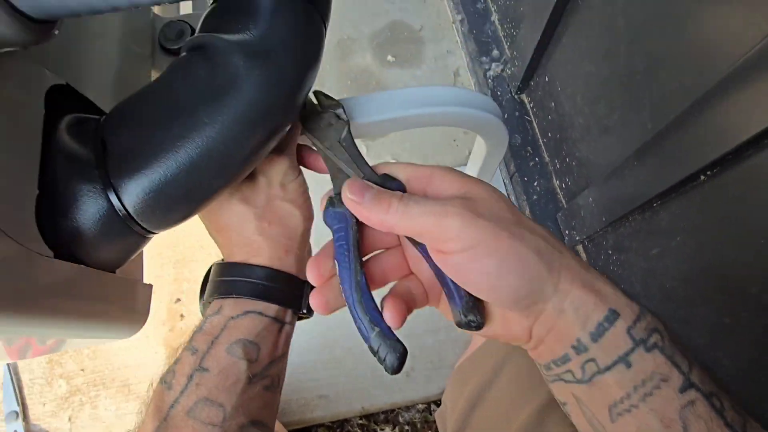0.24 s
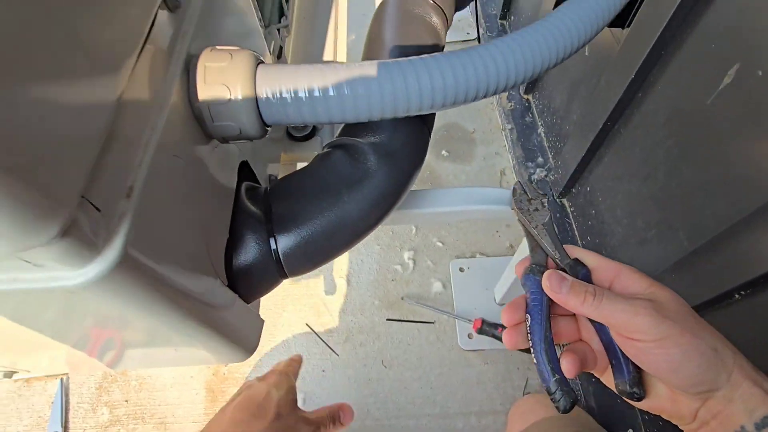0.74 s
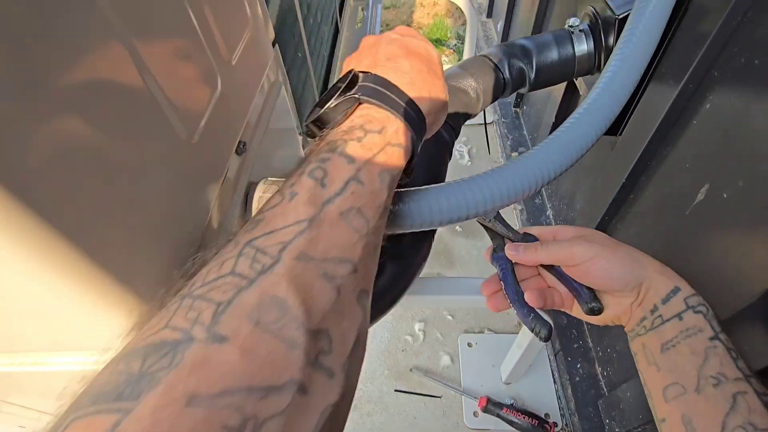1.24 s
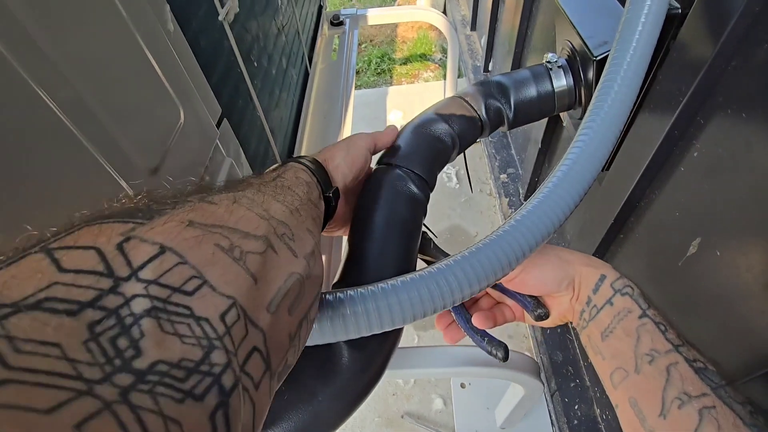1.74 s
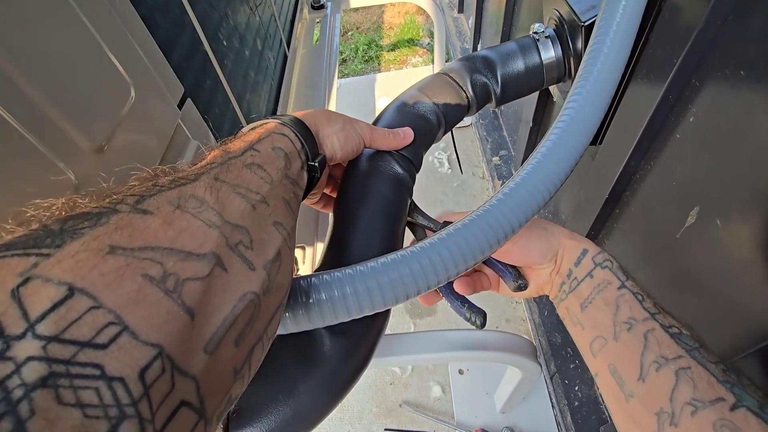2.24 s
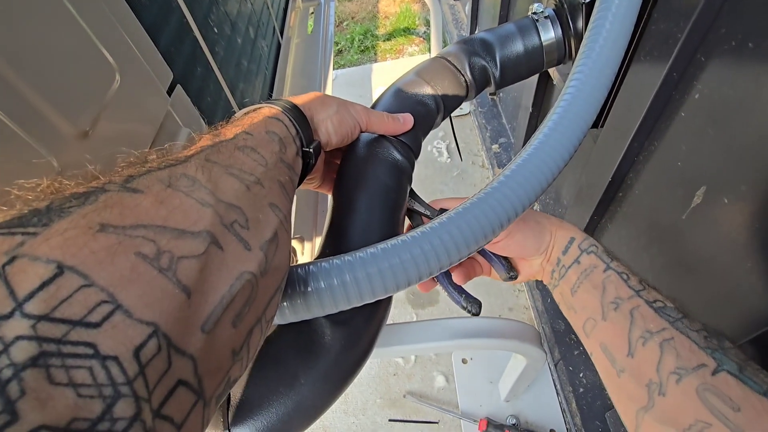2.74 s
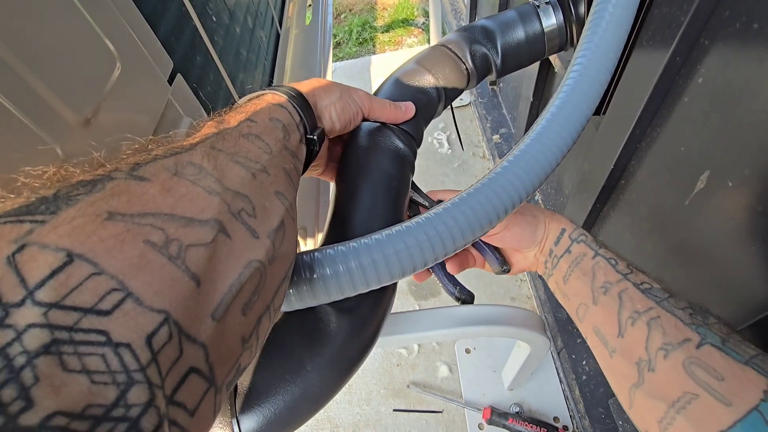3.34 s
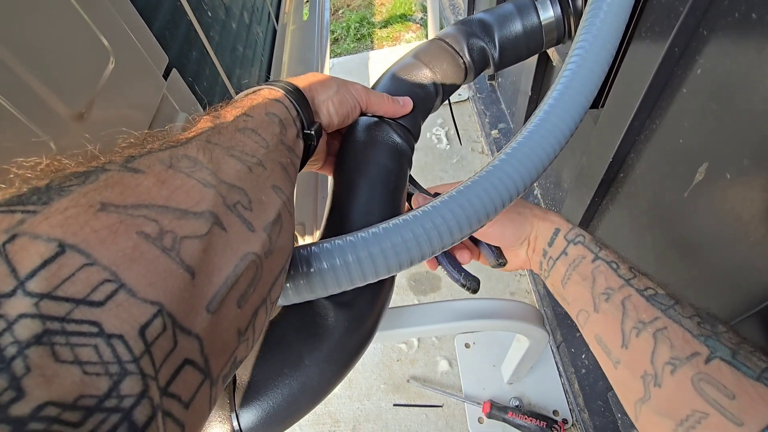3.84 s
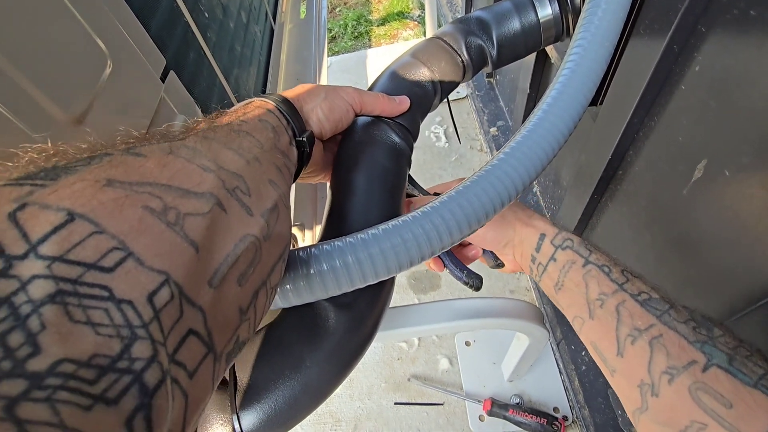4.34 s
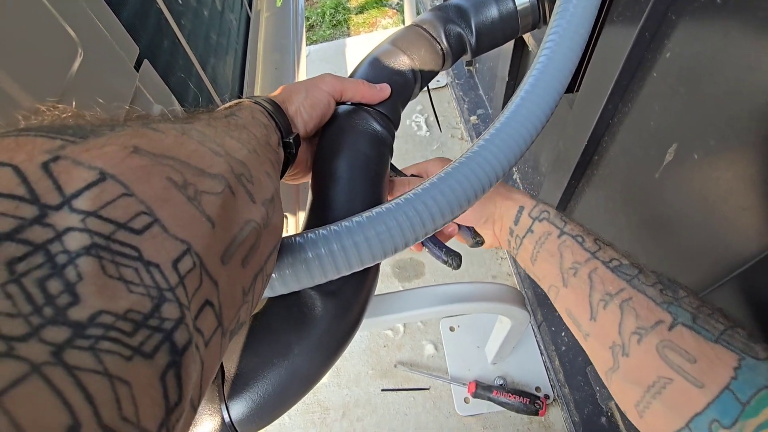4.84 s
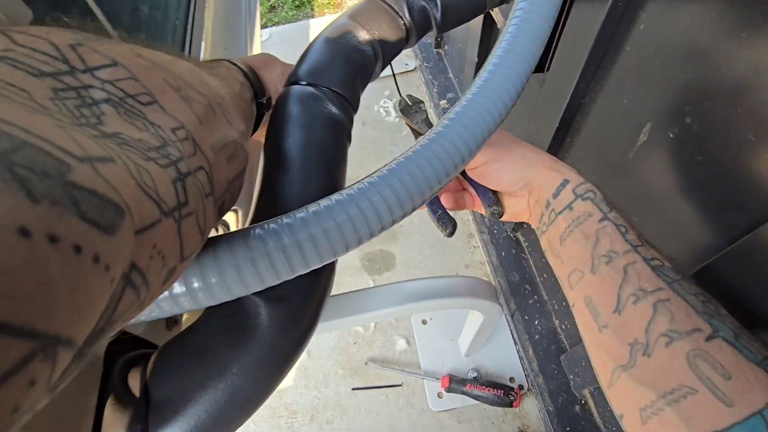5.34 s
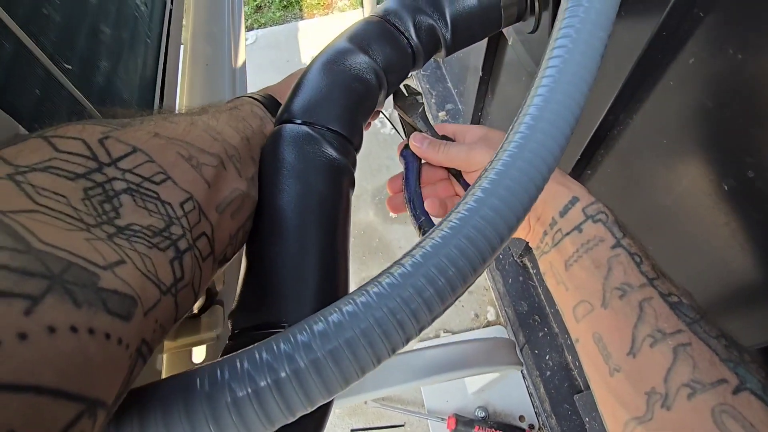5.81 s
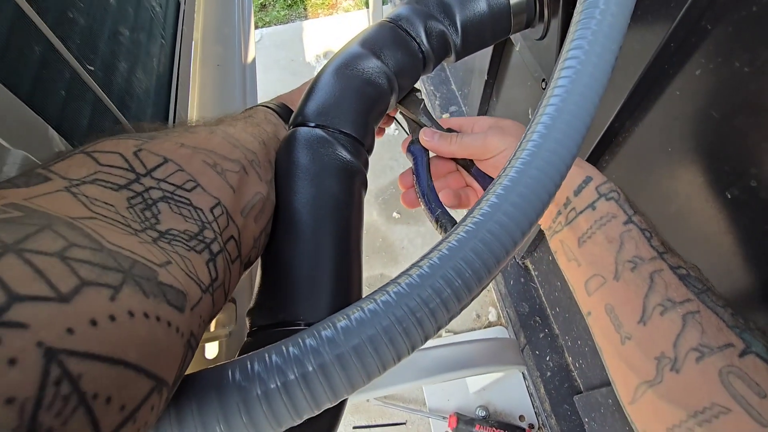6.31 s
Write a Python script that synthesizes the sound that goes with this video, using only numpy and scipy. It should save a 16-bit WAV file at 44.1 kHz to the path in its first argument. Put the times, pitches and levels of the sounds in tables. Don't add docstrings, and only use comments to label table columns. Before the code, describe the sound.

A low, broad distant traffic rumble with soft tyre wash runs throughout, strongest before 2 s and weaker after 4 s. At 0.2 s, after a tiny plastic creak, cutters make a loud, bright, dry snip with a quick rebound and short slap from close hard surfaces. Small clicks follow at 0.46 and 0.6 s, with hand and sleeve rustle and faint bird notes. A softer snip comes at 1.3 s, then a loud one at 1.7 s with a hollow pipe knock. Handling hiss lingers to about 3 s. A single chirp at 2.0 s precedes a buzzy trill from 2.5 to 3.3 s, while low wind buffets the right side; thin rising whistles follow until 4 s. Sparse faint ticks continue. A sharp snip at 5.1 s leads to a dull double metal-panel knock at 5.3 s, then light rustling and quieter rumble to 6.5 s.

```python
import sys
import numpy as np
from scipy import signal
from scipy.fft import rfft, irfft
from scipy.io import wavfile
from scipy.ndimage import uniform_filter1d

SR = 44100
rng = np.random.default_rng(int(sys.argv[2]) if len(sys.argv) > 2 else 0)


def invert_db(x):
    u = np.asarray(x, float) / 20
    return 10 ** u


def int16_out(signal):
    q = np.round(np.clip(np.atleast_2d(signal).T, -1, 1) * 32767)
    wavfile.write(sys.argv[1], SR, q.astype(np.int16))


N = 289737
LEAD_S = 0.005

# start in seconds, peak in dB, crack t60 in seconds, rebound delay in seconds,
# reflections in dB.
SNIPS = [
    (0.18, -22, 0.0033, 0.0015, -19.5),
    (0.191, -7.5, 0.0093, 0.0054, -16.5),
    (1.2811, -15.5, 0.011, 0.00337, -11),
    (1.7112, -7, 0.012, 0.0031, -11.5),
    (5.1048, -9.5, 0.0096, 0.0049, -14.5),
    (0.4613, -20, .017, 0.0023, -21),
    (0.5851, -29, .014, .003, -16),
]
# frequency in Hz, density in dB per Hz.
SNIP_COLOURS = [
    [(880, -46), (1500, -18.5), (3380, -7), (8520, -4), (13300, -23.5), (15000, -7.5), (17000, -38.5)],
    [(350, -39.5), (600, -22.5), (828, -20.5), (1410, -4.5), (1840, -17.5), (2470, 0.5), (4400, 4),
     (5470, -5), (8690, 0), (10400, -15), (11300, 0), (14400, -4.5), (17000, -27.5)],
    [(350, -18), (600, -0.5), (828, -1.5), (1040, -9), (2080, -2.5), (2330, 1), (3000, -3), (4960, -10.5),
     (6570, -6), (8690, -13), (15200, -18.5), (16300, -26), (17000, -57)],
    [(350, -20.5), (600, -2), (805, -3), (1050, -28), (1300, -5), (2700, -3), (3910, -9.5), (4500, -15),
     (7340, -12), (8100, -16), (14200, -12.5), (16100, -13.5), (17000, -63.5)],
    [(350, -53), (600, -12), (1100, -17), (1370, -6), (2080, -4), (3700, -8.5), (4500, -4), (7040, -8),
     (8210, -4), (9990, -18), (12500, -6), (15200, -12), (17000, -50)],
    [(530, -47), (900, -17), (1970, -11.5), (2640, -24), (4760, -7), (8890, -12.5), (11400, -5),
     (14900, 0.5), (16800, -17)],
    [(250, -25), (450, -0.5), (1300, -0.5), (2000, -4), (4670, -22), (9080, -23.5), (15000, -30),
     (16800, -49)],
]
# frequency in Hz, left-right difference in dB.
SNIP_LEANS = [
    [(60, 0), (950, 4.5), (15000, 3)],
    [(60, -0.5), (180, 9), (550, 3.5), (1650, 2), (4970, 0), (15000, 5)],
    [(60, 0.5), (180, -1.0), (550, 7), (1650, 4.5), (4970, 1.5), (15000, 9.5)],
    [(60, 10), (180, 5), (550, 7), (1650, 3), (4970, -8), (15000, 0)],
    [(60, -2), (180, -2), (550, -1.5), (1650, 4.5), (4970, -4.5), (15000, 4)],
    [(60, 2.5), (380, -1.0), (2380, -1), (15000, -5)],
    [(60, 0.5), (380, -1.0), (2380, 0.5), (15000, 0.5)],
]
# frequency in Hz, t60 in seconds.
GAP_DECAY = [(400, .2), (1500, .13), (5000, 0.097), (15000, .08)]
# start in seconds, length in seconds, centre in Hz, width in Hz,
# level in dB.
CREAKS = [
    (.157, .033, 3700, 250, -47),
    (1.265, .016, 2900, 400, -47),
    (5.084, .021, 6000, 500, -47),
    (5.085, .02, 7600, 250, -56),
    (5.088, .017, 11500, 700, -55),
    (5.075, .03, 3700, 120, -62),
]
# start in seconds, peak in dB, brightness in dB, crack t60 in seconds,
# left-right difference in dB.
TICKS = [(0.5725, -37, -2, 0.015, -5), (0.6233, -31.5, 15, 0.0076, -3.5), (1.022, -35.5, 19, 0.033, -1),
         (2.4947, -44, 4, 0.022, -4), (2.5974, -46.5, 11, 0.018, 0), (3.4904, -39, -24, 0.02, 1.5),
         (3.7094, -46, 4.5, 0.013, -0.5), (3.9964, -38.5, 4.5, 0.012, -1), (4.191, -56, 6, .012, -1),
         (4.302, -52, -10, .012, 0), (4.33, -54, -9, .012, 0), (4.361, -50, -4, .012, 0.5),
         (4.4678, -41.5, -10, 0.12, 2), (4.7905, -51.5, 8, 0.019, -8), (5.1627, -33.5, -14, 0.023, 0.5),
         (5.3159, -30.5, -5.5, 0.032, 1), (5.7564, -39.5, -10.5, 0.024, -6),
         (6.5475, -49.5, 0.5, 0.026, -5)]
# frequency in Hz, density in dB per Hz.
TICK_COLOUR = [(300, 1), (600, -4), (2700, -3), (7000, -3), (13500, -7), (15300, 0), (16300, -42.5)]
# start in seconds, blow in dB, pitch factor, ring factor, blow length in seconds.
PIPE_KNOCKS = [
    (0.192, -31.5, 1.4, 0.18, 0.0022),
    (0.584, -42, 1.7, 0.18, 0.0025),
    (1.279, -36, 1.61, 1, 0.0075),
    (1.711, -24.5, 1.11, 1, 0.0022),
    (5.103, -31, 1.45, 0.2, 0.006),
    (5.164, -46.5, 1.94, 0.33, 0.0032),
]
# frequency in Hz, level in dB, t60 in seconds.
PIPE_MODES = [(135, -9.5, 0.29), (214.7, -1.5, 0.21), (289, -9, 0.24), (380, 1.5, 0.073),
              (580, -2.5, 0.065), (799, -13, 0.053), (947, -19.5, 0.36)]
# start in seconds, blow in dB, pitch factor, ring factor,
# blow length in seconds.
CABINET_KNOCKS = [
    (5.3145, -32.5, 1.0, 1.0, 0.0032),
    (5.3295, -29, 1.0, 0.98, 0.0023),
    (2.932, -36, 1.12, 0.49, .008),
]
# frequency in Hz, level in dB, t60 in seconds.
CABINET_MODES = [(205, -14, .15), (258, -4, .4), (266, 0, .46), (340, -14, .15), (420, -14, .4),
                 (460, -8, .3), (538, -7, .25), (725, -11, .15), (870, -12, .1), (1389, -14, .12),
                 (1626, -12, .1), (1884, -16, .07)]
# frequency in Hz, density in dB per Hz.
BOOM = [(80, -32.5), (150, -5.5), (300, 2), (600, -15), (900, -20.5), (2000, -33), (4000, -45),
        (15500, -90)]
# start in seconds, length in seconds, centre in Hz, width in Hz, level in dB.
SCUFFS = [
    (4.455, .075, 1400, 1300, -57.5),
    (.82, .17, 2400, 450, -63),
    (3.31, .2, 3800, 900, -66.5),
    (5.322, .05, 1550, 360, -55),
    (1.365, .11, 10600, 3000, -60),
]
# start in seconds, length in seconds, stirred air in dB, rubbing in dB.
MOVES = [(-.3, .5, 9, -84), (.15, 0.47, 24, -62.5), (.5, 0.87, 16.5, -72.5), (1.206, 0.54, 20, -65),
         (1.536, .62, 21.5, -69), (1.999, 1.2, 16.5, -74), (3.045, 0.79, 8, -91.5), (3.946, .9, 8.5, -85),
         (5.206, 0.17, 17.5, -66.5), (4.4, .55, 3, -92), (3.44, .2, 12, -82), (5.27, .5, 16.5, -67),
         (5.5, 1.3, 9, -85)]
# frequency in Hz, density in dB per Hz.
RUBBING = [(5500, -18.5), (7000, 1), (9000, -1.5), (11000, -5.5), (12500, -18.5), (15600, -20),
           (16000, -80)]
# frequency in Hz, density in dB per Hz.
HISS = [(1350, -42.5), (2300, -3.5), (2890, -14.5), (3620, -1.5), (5030, -2.5), (6300, -3), (7400, -14),
        (9620, -49), (16300, -120)]
# frequency in Hz, density in dB per Hz.
FIZZ = [(9500, -22), (11000, -9.5), (12100, -1), (13200, -3.5), (15300, -3), (15800, -7), (16000, -75)]
# start in seconds, chip level in dB, number of chips.
TRILLS = [
    (2.0293, -52.5, 1),
    (2.5277, -45, 7),
]
# time in seconds, frequency in Hz, level in dB.
CHIP = [(-.006, 4190, -11), (.002, 4180, -3), (.009, 4157, 0.9), (.016, 4090, -4.5), (.022, 4020, -15)]
# time in seconds, frequency in Hz, level in dB.
FALL = [(.034, 5990, -9), (.044, 6450, -15), (.056, 6200, -11.5), (.064, 5500, -7), (.070, 4900, -10.5),
        (.078, 4200, -20)]
# time in seconds, frequency in Hz, level in dB.
RISE = [(0, 5790, -15.5), (.010, 6420, 4.5), (.020, 7300, -5), (.032, 7800, -19)]
# start in seconds, level in dB.
RISES = [
    (3.535, -54),
    (3.543, -61),
    (3.865, -53),
    (3.874, -60),
]
# time in seconds, frequency in Hz, level in dB.
WHISTLES = [
    [(3.565, 3940, -72), (3.593, 3890, -51.5), (3.70, 3820, -57.5), (3.73, 3760, -69.5)],
    [(3.855, 3920, -75), (3.94, 3775, -50.5), (4.03, 3770, -55.5), (4.05, 3760, -68.5)],
    [(0.71, 2150, -62), (0.74, 2060, -66), (0.764, 2040, -58), (0.8, 2050, -64)],
]
# time in seconds, frequency in Hz, level in dB.
FAR_SONG = [
    [(.66, 4800, -72), (.70, 3850, -64), (.75, 4550, -66), (.79, 4600, -72)],
    [(.825, 3750, -59), (.85, 3750, -56), (.87, 3700, -64)],
    [(.89, 4400, -68), (.93, 3700, -64), (.98, 4500, -65), (1.0, 4500, -72)],
    [(1.17, 5800, -66), (1.21, 4600, -62), (1.25, 3900, -62)],
]
# time in seconds, closeness in dB.
TRAFFIC = [(0.0, 3), (0.4, 5), (1.1, 1), (1.45, 6), (1.8, 6.5), (2.2, 2), (3.2, 1.5), (3.75, 0),
           (4.3, -5.5), (5.1, -8), (5.35, -4), (5.6, -5), (6.05, -3), (6.57, -9)]
# frequency in Hz, density in dB per Hz.
RUMBLE = [(21, -33), (36, 1), (86, -5), (209, -3.5), (234, -3), (267, -14.5), (296, -30.5), (332, -16),
          (420, -26.5), (550, -31), (920, -120)]
# frequency in Hz, density in dB per Hz.
DRONE = [(160, -40.5), (280, -2), (333, -2.5), (421, -7), (461, -2.5), (723, 1), (880, -5.5), (1140, -39.5),
         (1940, -120)]
# frequency in Hz, density in dB per Hz.
WASH = [(540, -35.5), (920, -8), (1160, -2), (1320, 0), (1960, -6.5), (2150, -11), (3200, -12.5),
        (4160, -42), (7040, -120)]
# time of full strength in seconds, hold in seconds, level in dB.
GUSTS = [
    (1.0, .5, -55),
    (2.554, 0.4, -37),
    (5.25, .03, -53),
]
# frequency in Hz, density in dB per Hz.
WIND = [(25, -31), (45, 2.5), (120, -5), (250, -7.5), (450, -22), (900, -62), (6000, -85), (16000, -120)]
# frequency in Hz, left-right likeness.
SAME = [(60, 1), (150, 0.99), (380, 0.99), (950, 0), (2380, 0.017), (5980, 0), (15000, 0.0059)]
# frequency in Hz, left-right difference in dB.
LEAN = [(60, 1.5), (110, -1), (200, 0.5), (380, -1.5), (700, -1.5), (1290, 3.0), (2380, 0), (4400, -3.5),
        (8120, 0), (15000, -7)]


def snip(colour, lean, db, t60, bounce_s, gap_db):
    colour_db = lambda hz: read(colour, hz)
    lean_db = lambda hz: read(lean, hz)
    return invert_db(db + 9.5) * crack(colour_db, lean_db, t60, bounce_s, gap_db, gap_db)


def crack(colour_db, lean_db, t60, bounce_s, bounce_db, gap_db):
    size = 8192
    t, hz = np.arange(size) / SR, np.fft.rfftfreq(size, 1 / SR)

    def strike(u):
        attack = np.minimum(abs(u) / 0.00038, 1)
        return (u > 0) * invert_db(-60 * abs(u) / max(t60, 0.004)) * attack

    shape = strike(t - LEAD_S) + invert_db(bounce_db) * strike(t - LEAD_S - bounce_s)
    z = rfft(ear_noise(lambda f: 0 * f, size) * shape)
    z /= np.sqrt(uniform_filter1d(abs(z) ** 2, size=60, axis=1))
    ears = sides(lean_db(hz))
    onset = np.clip(1 + (t - LEAD_S) / 0.0007, 0, 1) ** 2
    direct = irfft(z * invert_db(colour_db(hz)) * ears, size) * onset

    reflected = irfft(rfft(ear_noise(colour_db, size)) * ears)
    bins, frame_s, z = signal.stft(reflected, SR, nperseg=128)
    decay = invert_db(-60 * frame_s / read(GAP_DECAY, bins)[:, None])
    tail = signal.istft(z * decay, SR, nperseg=128)[1][:, :size]
    build_up = np.clip((t - LEAD_S) / 0.0088, 0, 1)
    return direct / abs(direct).max() + invert_db(gap_db - 5.5) * tail * build_up


def creak(*row):
    return friction(*row, lambda size: signal.windows.tukey(size, 0.3) * np.linspace(0.3, 1.5, size))


def friction(length_s, hz, width_hz, db, envelope):
    size = round(length_s * SR)

    def resonance_db(f):
        offset = (f - hz) / width_hz
        return -20 * np.log10(1 + offset ** 2 + offset ** 4)

    return invert_db(db) * ear_noise(resonance_db, size) * envelope(size)


def tick(db, bright_db, t60, pan_db):
    tilt = [(1100, 5 - bright_db), (2200, 0.013), (7500, 0.03), (11000, bright_db - 9.5)]  # (Hz, dB)
    colour_db = lambda hz: read(TICK_COLOUR, hz) + read(tilt, hz)
    lean_db = lambda hz: pan_db + 0 * hz
    return invert_db(db + 5) * crack(colour_db, lean_db, t60, bounce_s=0.0022, bounce_db=-30, gap_db=-14)


def knock(modes, db, pitch, ring, blow_s):
    t = np.arange(SR // 2) / SR
    body = 0
    for hz, level_db, t60 in modes:
        body = body + invert_db(level_db - 60 * t / (t60 * ring)) * np.sin(2 * np.pi * hz * pitch * t)
    u = t[:2000] / blow_s
    blow = (1 + 0.9 * ear_noise(lambda hz: 0 * hz, 2000)) * u * np.exp(-4 * u)
    x = signal.fftconvolve(blow, body[None], axes=1)[:, :len(t)]
    x = signal.sosfilt(signal.butter(2, 140 * pitch, "high", fs=SR, output="sos"), x)
    boom = ear_noise(lambda hz: read(BOOM, hz / pitch), len(t))
    boom *= invert_db(-60 * t / (0.4 * ring)) * np.minimum(t / 0.015, 1)
    return invert_db(db + 8.5) * (x / abs(x).max() + invert_db(-10) * boom)


def scuff(*row):
    def envelope(size):
        uneven = abs(evened(uniform_filter1d(rng.standard_normal(size), size=150)))
        return 2 * np.hanning(size) * np.linspace(1.5, 0.4, size) * (0.8 + 0.4 * uneven)

    return friction(*row, envelope)


def moves(column, still_db, t):
    power = invert_db(2 * still_db) + 0 * t
    edge = 0.75
    for row in MOVES:
        u = (t - row[0]) / row[1]
        swell = np.sin(np.pi / 2 * np.clip(2 * np.minimum(u, 1 - u) / edge, 0, 1))
        power = power + (invert_db(row[column]) * swell) ** 2
    return 10 * np.log10(power)


def rubbing(t):
    return bed(RUBBING, t, moves(column=3, still_db=-93.5, t=t), patchy_db=2.7, flicker_db=2.2)


def air(t):
    stir = moves(column=2, still_db=-6, t=t)
    hiss = bed(HISS, t, -76 + 0.74 * stir, patchy_db=1.6, flicker_db=1.0)
    return hiss + bed(FIZZ, t, -84 + stir, patchy_db=2.1, flicker_db=1.5)


def birds():
    song = np.zeros((1, N))
    for start, db, chips in TRILLS:
        for k in range(chips):
            s = start + k * (0.1107 + k * 0.00056)
            add(song, s + CHIP[0][0], invert_db(db - 2.5) * note(CHIP, 0.062)[None])
            add(song, s + FALL[0][0], invert_db(-41.5) * note(FALL, 0.39)[None])
    for s, db in RISES:
        add(song, s, invert_db(db) * note(RISE, 0.33)[None])
    for rows in WHISTLES:
        add(song, rows[0][0], note(rows, 0.069)[None])
    for rows in FAR_SONG:
        add(song, rows[0][0], invert_db(-2) * note(rows, 0.25)[None])
    t = np.arange(6000) / SR
    echo = rng.standard_normal((2, 6000)) * invert_db(-60 * t / 0.15) * (t > 0.004)
    wet = signal.fftconvolve(song, echo / np.linalg.norm(echo[0]), axes=1)[:, :N]
    ears = np.vstack([np.roll(song, 3), song])
    return sides(-8) * ears + invert_db(-15) * wet


def note(rows, rough):
    s, hz, db = np.transpose(rows)
    t = np.arange(s[0], s[-1], 1 / SR)
    flutter = evened(signal.oaconvolve(rng.standard_normal((2, len(t))), np.hanning(90)[None], "same"))
    turns = np.cumsum(np.interp(t, s, hz) * (1 + 0.08 * rough * flutter[0])) / SR
    level = invert_db(np.interp(t, s, db)) * (1 + 1.4 * rough * flutter[1])
    level *= signal.windows.tukey(len(t), 0.15)
    return np.sqrt(2) * level * np.sin(2 * np.pi * turns)


def traffic(t):
    near = np.interp(t, *np.transpose(TRAFFIC))
    passing = 4 * np.exp(-((t - 2.89) / 1.0) ** 2)
    rumble = bed(RUMBLE, t, -44 + 0.47 * near, patchy_db=1.1, flicker_db=1.8)
    wash = bed(WASH, t, -61 + near, patchy_db=1.5, flicker_db=0.98)
    drone = bed(DRONE, t, -59 + 0.54 * near + passing, patchy_db=0.63, flicker_db=0.97)
    return rumble + wash + drone


def wind(t):
    power = invert_db(2 * -59.5) + 0 * t
    for s, hold, db in GUSTS:
        rise = 48 * np.maximum(s - t, 0)
        fall = 32.5 * np.maximum(t - s - hold, 0)
        power = power + invert_db(2 * (db - rise - fall))
    return bed(WIND, t, 10 * np.log10(power), patchy_db=2.0, flicker_db=2.1) * np.array([[0.15], [1.7]])


def bed(spectrum, s, level_db, patchy_db, flicker_db):
    frames, hz = N // 256 + 5, np.fft.rfftfreq(1024, 1 / SR)
    a, b, c, d, patches = rng.standard_normal((frames, 513, 5)).T
    patches = evened(uniform_filter1d(uniform_filter1d(patches, 12, 0), 16, 1))
    flicker = evened(uniform_filter1d(rng.standard_normal(frames), 4))
    same = np.clip(read(SAME, hz), -1, 1)[:, None]
    left = a + 1j * b
    z = np.array([left, same * left + np.sqrt(1 - same ** 2) * (c + 1j * d)])
    z *= invert_db(read(spectrum, hz)[:, None] + patchy_db * patches + flicker_db * flicker)
    z *= sides(read(LEAN, hz))[:, :, None]
    x = signal.istft(z, nperseg=1024, noverlap=768)[1][:, :N]
    level = invert_db(np.interp(np.arange(N) / SR, s, level_db))
    return level * x / np.sqrt(np.mean(x.mean(0) ** 2))


def ear_noise(colour_db, size):
    hz = np.fft.rfftfreq(size, 1 / SR)
    a, b = rfft(rng.standard_normal((2, size)))
    same = np.clip(read(SAME, hz), -1, 1)
    late = np.exp(-2j * np.pi * hz * 0.00024)
    pair = np.array([a * late, same * a + np.sqrt(1 - same ** 2) * b])
    return evened(irfft(pair * invert_db(colour_db(hz)), size))


def sides(pan_db):
    return invert_db(np.array([[0.5], [-0.5]]) * pan_db)


def evened(x):
    return x / np.sqrt(np.mean(x ** 2) + 1e-20)


def read(points, hz):
    f, value = np.transpose(points)
    return np.interp(np.log(hz + 1), np.log(f + 1), value)


def add(mix, s, sound):
    part = mix[:, round(s * SR):][:, :sound.shape[1]]
    part += sound[:, :part.shape[1]]


def scene():
    t = np.arange(0, N / SR, 256 / SR)
    mix = traffic(t) + wind(t) + air(t) + rubbing(t) + birds()
    for (s, *row), colour, lean in zip(SNIPS, SNIP_COLOURS, SNIP_LEANS):
        add(mix, s - LEAD_S, snip(colour, lean, *row))
    for s, *row in TICKS:
        add(mix, s - LEAD_S + 0.0006, tick(*row))
    for s, *row in CREAKS:
        add(mix, s, creak(*row))
    for s, *row in SCUFFS:
        add(mix, s, scuff(*row))
    for s, *row in PIPE_KNOCKS:
        add(mix, s, knock(PIPE_MODES, *row))
    for s, *row in CABINET_KNOCKS:
        add(mix, s, knock(CABINET_MODES, *row))
    return mix


def roll_off(x):
    return signal.sosfilt(signal.butter(12, 17150, fs=SR, output="sos"), x)


def record(dry):
    cut = signal.sosfilt(signal.butter(4, 42, "high", fs=SR, output="sos"), dry)
    cut = np.clip(cut, -0.9, 0.9)
    low_pass = signal.firwin(255, 16800, window=("kaiser", 9), fs=SR)
    limited = signal.oaconvolve(cut, low_pass[None], "same")
    return roll_off(limited)


dry = scene()
out = record(dry)
int16_out(out)
```